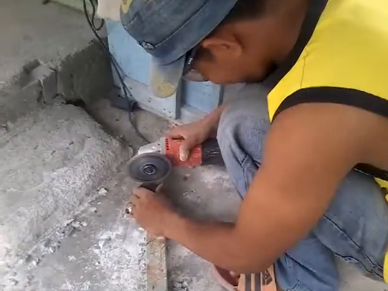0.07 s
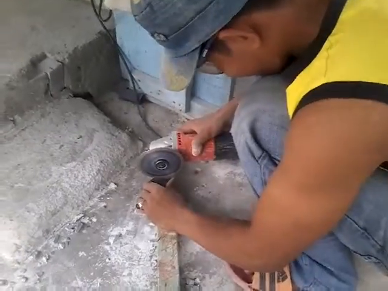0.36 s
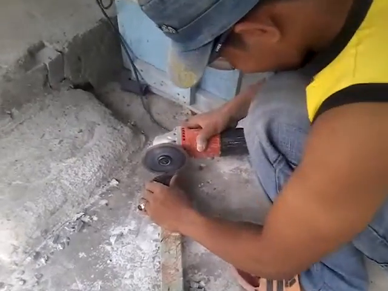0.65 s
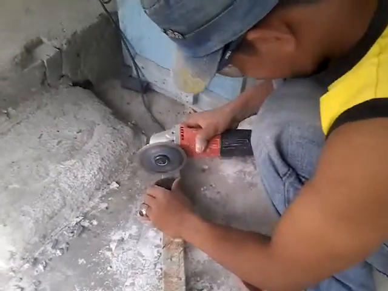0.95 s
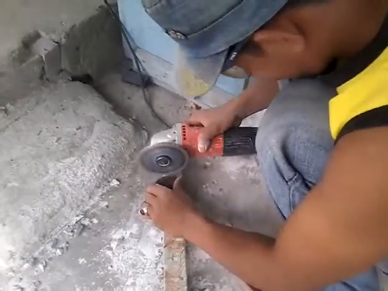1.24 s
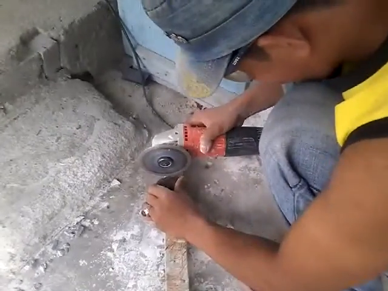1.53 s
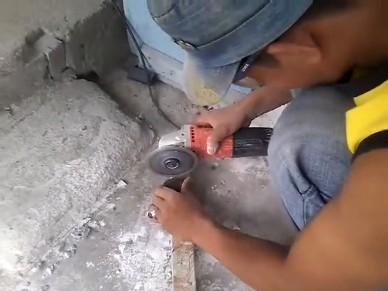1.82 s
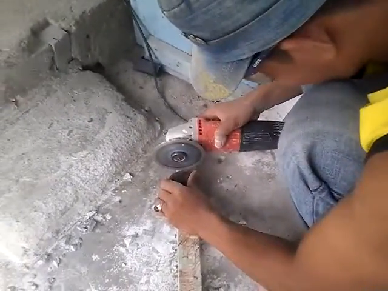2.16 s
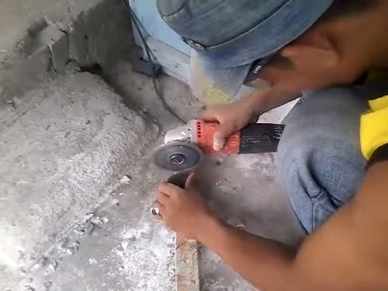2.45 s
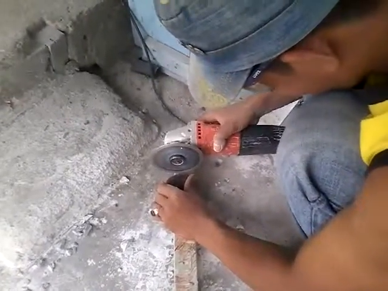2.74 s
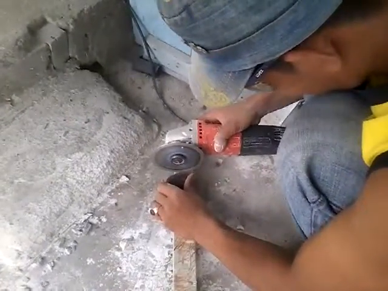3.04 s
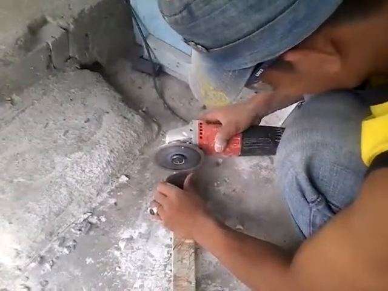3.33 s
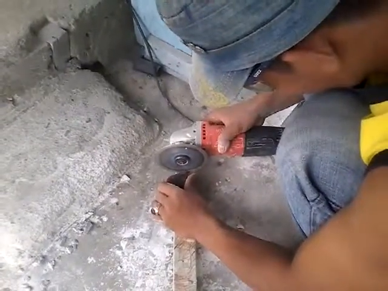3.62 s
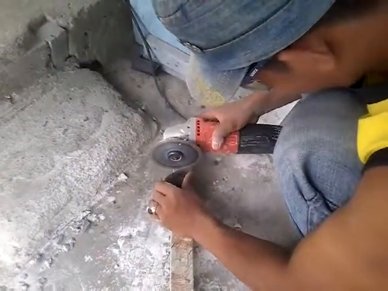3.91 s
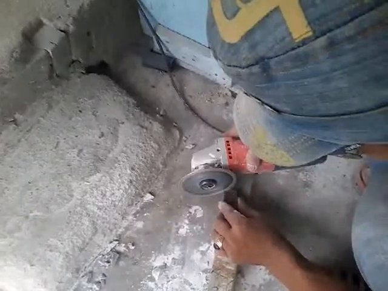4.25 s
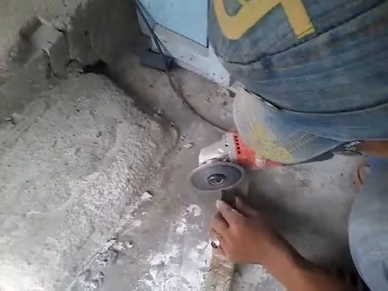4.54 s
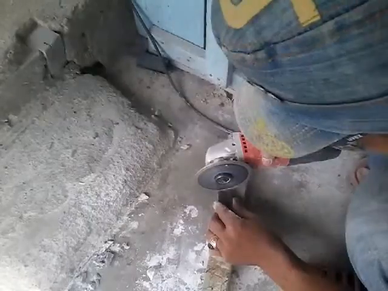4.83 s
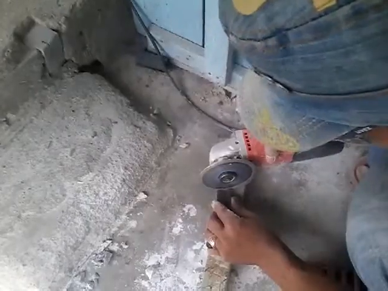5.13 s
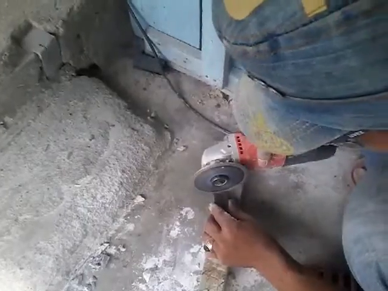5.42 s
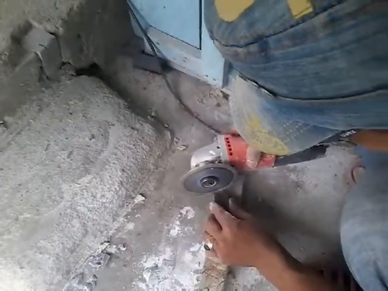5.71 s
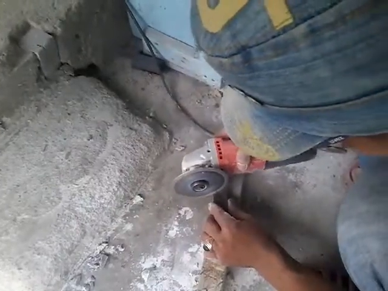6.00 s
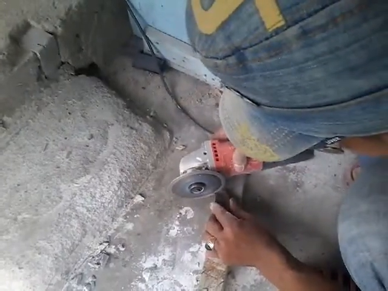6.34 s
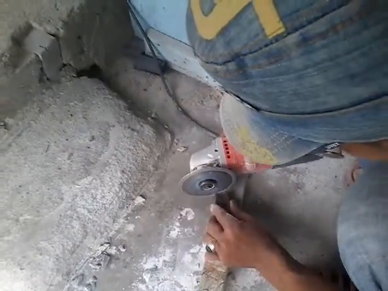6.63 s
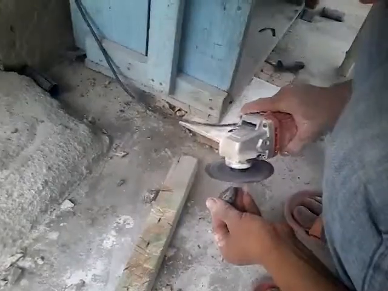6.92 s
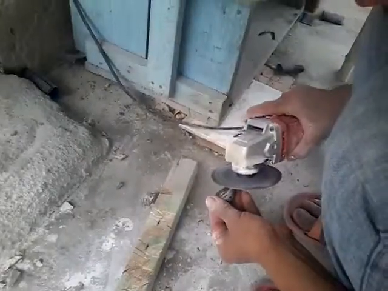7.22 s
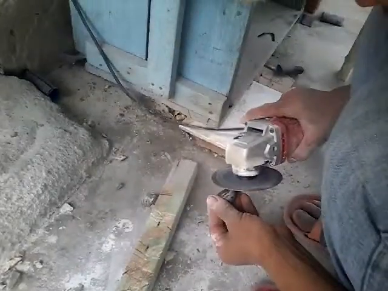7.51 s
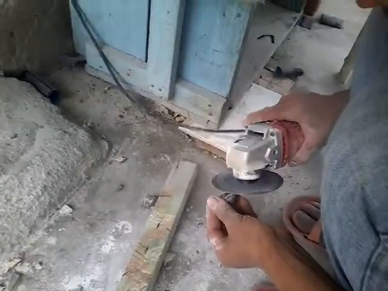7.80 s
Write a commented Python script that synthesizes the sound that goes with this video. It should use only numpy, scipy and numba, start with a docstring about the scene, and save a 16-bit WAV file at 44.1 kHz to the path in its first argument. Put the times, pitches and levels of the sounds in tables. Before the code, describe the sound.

Close, gritty grinding of stone on an angle grinder's disc, light and squealing, then hard and loud, over the motor's high whine.

```python
"""A stone rasps briefly on the steel disc of a whining angle grinder, then is held to it lightly, hard, and
in dabs: three spells of work; the sound cuts abruptly from each to the next. Grit scrapes the stone and
drives the modes of disc and guard; stick-slip friction makes the disc squeal, mostly at light touch.
The motor's fan whines at its blade-passing frequency, which sinks under load, amid the rush of cooling air.
A phone close above picks it up in mono."""
import sys
import numpy as np
from scipy import signal
from scipy.fft import rfft, irfft
from scipy.io import wavfile
from scipy.ndimage import uniform_filter1d, minimum_filter1d
from numba import njit

SR = 44100
rng = np.random.default_rng(int(sys.argv[2]) if len(sys.argv) > 2 else 0)


def bounce(signal):
    """Save signal as a 16-bit WAV file at the path given by the first command-line argument."""
    frames = np.transpose(np.atleast_2d(signal))
    limited = np.clip(frames, -1, 1)
    pcm = np.round(limited * 32767).astype(np.int16)
    wavfile.write(sys.argv[1], SR, pcm)


N = 351036
TIME = np.arange(N) / SR

# spells of work: start t/s, rotor speed at the start f/Hz, speed approached without load f/Hz
SPELLS = [(0, 474.3, 508.6), (3.68, 472.6, 508.8), (6.25, 487, 502.4)]


def grinding(motor_hz, contact, seating, flex, gear_ratio=2.84):
    """Friction noise: one rough force makes the dry scrape and rings disc and guard, as the rim knocks."""
    # spectrum of the scrape: f/Hz, relative level/dB
    scrape_spectrum = [(60, -33), (600, -24), (900, -27), (1400, -15), (1800, -8.5), (2100, -6.5),
                       (2500, 3.5), (4500, 6.5), (6200, -32), (9000, 12), (11000, 5.5), (13000, 2.5),
                       (13700, -9), (14300, -45)]
    # disc modes: touching f/Hz, pressed f/Hz, nominal width/Hz,
    # level/dB touching, on edge and flat, change/dB with the tool tipped up
    disc_modes = [(2405, 2420, 45, -25, -29, -30, -8), (3255, 3245, 42, -18, -12.5, -14, -4),
                  (3360, 3352, 60, -15, -4.5, -10, 1.5), (3595, 3608, 50, -19.5, -16, -13, -2),
                  (3714, 3730, 36, -13.5, -19, -18, -4), (4400, 4340, 58, -12, -9.5, -2.8, 4),
                  (4515, 4490, 50, -12.5, -16, -14, 2), (4680, 4700, 55, -18, -19, -18.5, -2),
                  (5665, 5650, 55, -7, 0.5, -2.5, 3), (6015, 6100, 42, -14, -5.5, -4.5, 2),
                  (6680, 6660, 50, -22, -17, -12, 0), (7210, 7240, 35, -13, -8, -7, 8),
                  (7380, 7335, 48, -0.5, 3, 2.5, 2.5), (7775, 7820, 36, -3, -3, -6, -7),
                  (8128, 8170, 55, -7, -5, -8, -5), (8560, 8440, 55, -10.5, -14, -11, -3),
                  (8820, 8830, 100, -13, -11, -11.5, -4), (9150, 9120, 70, -15, -18, -12, -3),
                  (9490, 9475, 36, -6.5, -2.5, -9.5, 4), (9560, 9570, 46, -12, -7.5, -5.5, -4),
                  (9860, 9965, 40, -10, -9, -9.5, 2), (10150, 10170, 65, -12, -16, -14, -2),
                  (10840, 10780, 50, -12, -20.5, -20.5, -2), (11300, 11300, 85, -11.5, -19, -20, 0),
                  (11900, 11820, 48, -10, -13.5, -14.5, -4), (12190, 12300, 35, -14.5, -15, -15.5, 0),
                  (12930, 13080, 90, -16.5, -21, -19, 0), (14380, 14400, 130, -23, -20, -17.5, 0)]
    # low modes of the guard: columns as for the disc
    guard_modes = [(670, 623, 120, -58, -41, -57, -3), (861, 803, 55, -28.5, -61, -30.5, 6),
                   (1036, 1130, 23, -39.5, -30.5, -38.5, 2), (1372, 1420, 115, -26.5, -27.5, -26.5, 3),
                   (1667, 1560, 63, -29.5, -36, -36, 3), (1810, 1800, 100, -40, -26, -26, 11)]
    force = grit()
    scrape = colour(force, scrape_spectrum)
    disc = steel(force, seating, flex, disc_modes, damping=0.59)
    guard = steel(force, seating, flex, guard_modes, damping=0.33)
    knocks = rim(angle(motor_hz / gear_ratio), seating)
    return contact * (disc + undb(-1) * (scrape + guard + knocks))


def grit(grain_db=3.5, chatter_db=0.36):
    """Random impacts: grains of uneven size strike the stone, which chatters in the hand."""
    return unit(rng.standard_normal(N) * undb(grain_db * walk(990) + chatter_db * walk(61)))


def steel(force, seating, flex, modes, damping, slide_hz=6, slide_db=0.9):
    """Modal superposition: the lie of the stone tunes and weights the modes; flexing scales the lowest."""
    press = np.minimum(seating, 1)
    # tipping the tool up, over 0.17 s around 6.3 s, turns other modes to the microphone
    tipped = np.clip((TIME - 6.3) / 0.17 + .5, 0, 1)
    out = 0
    for touch_hz, press_hz, width, *seat_db, tipped_db in modes:
        # as the stone slides about, each mode drifts in pitch and strength
        hz = touch_hz + press * (press_hz - touch_hz) + slide_hz * drift(9)
        level_db = np.interp(seating, [0, 1, 2], seat_db) + tipped * tipped_db + slide_db * drift(9)
        nearby_force = ring(force, hz, 10. * width)
        mode = unit(ring(nearby_force, hz, damping * width))
        out += mode * undb(level_db) * (flex if touch_hz < 4000 else 1)
    return out


def rim(spindle, seating, waver_db=12.5):
    """Periodic forcing: the uneven rim knocks at spindle harmonics, the higher ones under a flat stone."""
    # rim tones: harmonic number, touching level/dB, flat level/dB
    harmonics = [(1, -37, -77), (2, -39, -73), (5, -32, -29), (6, -39, -29.5), (8, -26, -69),
                 (9, -34.5, -30), (10, -22.5, -67), (12, -28, -28), (14, -23.5, -34.5), (17, -32, -23),
                 (18, -33, -24.5), (19, -48, -23), (28, -30, -14)]
    out = 0
    for order, touch_db, flat_db in harmonics:
        level_db = touch_db + seating / 2 * (flat_db - touch_db) + waver_db * np.minimum(drift(45), 1)
        out += undb(level_db) * np.sin(order * spindle + drift(35))
    return out


def squeal(width_hz=45., build_s=0.055, swell_s=0.0053):
    """Self-excited vibration: two modes ring shrilly at light touch; at times one grows by stick-slip."""
    # modes on the verge of squealing: start t/s, end t/s, first f/Hz, last f/Hz, level/dB
    shrill_modes = [(1.56, 3.22, 7415, 7365, -18.5), (1.57, 3.0, 7775, 7780, -22)]
    # stick-slip squeals: start t/s, end t/s, level/dB
    squeals = [(1.572, 1.707, -7), (1.786, 1.892, -8.5), (1.906, 2.022, -9), (2.11, 2.242, -5),
               (2.248, 2.278, -5), (2.311, 2.334, -8), (2.453, 2.475, -8), (2.535, 2.573, -9.5),
               (2.687, 2.787, -10), (2.907, 2.94, -6.5), (2.951, 3.044, -9), (3.099, 3.138, -4.5),
               (5.736, 5.84, -12.5), (6.929, 7, -13), (7.271, 7.38, -15)]
    # pitch of the squeal, sinking as the stone bears down: t/s, f/Hz
    glide = [(1.9, 7418), (3.1, 7368)]
    shrill = 0
    for start, end, first_hz, last_hz, db in shrill_modes:
        hz = np.interp(TIME, [start, end], [first_hz, last_hz])
        nearby_force = ring(grit(), hz, 10 * width_hz)
        mode = unit(ring(nearby_force, hz, width_hz))
        shrill += eased(held([(start, end)], [undb(db)]), build_s) * mode
    envelope = eased(held(squeals, [undb(db) for _, _, db in squeals]), swell_s)
    squeal_hz = curve(glide) + 18 * walk(110)
    # the swing saturates while it holds, and passing grains roughen it
    grip_db = 3 * np.minimum(walk(70), .6) + 1.6 * walk(300)
    return shrill + envelope * undb(grip_db) * np.sin(angle(squeal_hz))


def motor_speed(drag_hz, lag_s=1.12):
    """First-order lag: in each spell the rotor creeps towards its free speed less the stone's drag."""
    hz = np.zeros(N)
    step = 1 / (lag_s * SR)
    for start, first_hz, free_hz in SPELLS:
        since = TIME >= start
        target_hz = free_hz - drag_hz[since]
        hz[since] = first_hz + signal.lfilter([step], [1, step - 1], target_hz - first_hz)
    return hz


def fan(motor_hz, loud, blades=12, flutter=0.14):
    """Blade-passing tone: blades chop the air into a whine and its octave; imbalance hums once a turn."""
    # the whine, which beams as the tool is turned: t/s, level/dB
    whine_levels = [(0.0, -44), (0.27, -29), (0.4, -24), (0.54, -31), (0.65, -17.5), (0.76, -31),
                    (0.94, -27), (1.13, -19.5), (1.28, -10.5), (1.52, -11), (1.72, -19), (1.86, -40),
                    (2.08, -19), (2.16, -25), (2.33, -19.5), (2.48, -27.5), (2.7, -18), (2.79, -29),
                    (2.88, -20), (3.1, -31), (3.36, -20.5), (3.47, -24), (3.62, -18.5), (4.1, -37),
                    (6.2, -28), (6.33, -20), (6.56, -13), (6.9, -17.5), (7.15, -16.5), (7.27, -12),
                    (7.55, -14.5), (7.7, -10), (7.84, -20), (7.93, -11.5)]
    # hum of the rotor: t/s, level/dB
    hum_levels = [(0, -85), (0.25, -55), (0.8, -53.5), (1.3, -43), (2.2, -46.5), (2.8, -60), (3.6, -52.5),
                  (4.5, -58), (6.2, -54), (6.6, -46), (7.96, -45)]
    shaft = angle(motor_hz * (1 + 0.00078 * walk(39.1)))
    whine_db = curve(whine_levels)
    off_beam = np.clip((-12 - whine_db) / 8, 0, 1)
    fading_db = 0.5 * off_beam * walk(9.3)
    whine = undb(whine_db + fading_db) * (1 + flutter * walk(230)) * np.sin(blades * shaft)
    # the octave beams less than the main tone
    octave = undb(-25 + 0.51 * whine_db - 2.3 * loud + 2 * walk(22)) * np.sin(2 * blades * shaft)
    # the low hum flickers in and out during loud grinding
    hum_flicker_db = 5 * loud * np.clip(4 * walk(10), -3, 1)
    hum = undb(curve(hum_levels) + 7 * np.minimum(walk(34), 1) + hum_flicker_db) * np.sin(shaft)
    return np.sqrt(2) * (whine + octave + hum)


def cooling_air(loud, flicker_db=1.34, drop_db=-25):
    """Turbulence: fan and disc hiss; vents and housing roar, heard less while the grinding is loud."""
    # strength of the airflow's sound: t/s, relative level/dB
    air_levels = [(0, -27), (.8, -26), (1.3, -19), (1.9, -23.5), (2.6, -28.5), (3.5, -26.5), (4.5, -27),
                  (6.1, -27.5), (6.5, -23.5), (7.96, -23)]
    # spectrum of the hiss: f/Hz, relative level/dB
    hiss_spectrum = [(400, -57), (1500, -33), (3000, -11), (3800, -7.5), (4400, -2.5), (5300, -4),
                     (6500, -1), (7300, 3.5), (8500, -6.5), (9800, -13.5), (11500, -12.5), (12400, -45),
                     (13300, -57)]
    # spectrum of the vents: f/Hz, relative level/dB
    vent_spectrum = [(250, -37), (450, 5.5), (900, 14.5), (1450, 17), (1750, 18), (2150, 15), (3000, 4.5),
                     (6000, -35)]
    # resonances of the motor housing: f/Hz, width/Hz, level/dB relative to the vents
    housing_modes = [(603.6, 4.6, -16), (765, 3.2, -22.5), (1700, 5.2, -11.5)]
    # roar in each spell: level/dB relative to air_levels
    roar_levels = [-11.5, -25, -6.5]
    air_db = curve(air_levels)
    hiss = colour(rng.standard_normal(N), hiss_spectrum) * undb(air_db + 6 + flicker_db * walk(4.2))
    flow = rng.standard_normal(N)
    housing = sum(undb(db) * unit(ring(flow, np.full(N, float(hz)), width))
                  for hz, width, db in housing_modes)
    spell = np.searchsorted([start for start, _, _ in SPELLS], TIME, side="right") - 1
    roar_db = air_db + np.array(roar_levels)[spell] + drop_db * loud + walk(22)
    return hiss + (colour(flow, vent_spectrum) + housing) * undb(roar_db)


def wind_noise(loud, gust_db=3, drop_db=-24):
    """Pressure fluctuations: a low rumble, and air buffeting the microphone once the tool is tipped up."""
    # low rumble: t/s, level/dB
    rumble_levels = [(0, -47), (1.0, -44), (1.9, -42), (2.6, -33), (3.5, -37.5), (4.7, -43), (6.2, -47),
                     (6.7, -40), (7.96, -40)]
    # its spectrum: f/Hz, relative level/dB
    rumble_spectrum = [(25, -20), (70, -13), (120, 5), (170, 4.5), (250, 6.5), (340, -3.5), (600, -13)]
    # buffeting at the microphone: t/s, level/dB
    buffet_levels = [(0, -78), (6.2, -79), (6.35, -48), (6.6, -40.5), (7.2, -38.5), (7.96, -40)]
    # its spectrum: f/Hz, relative level/dB
    buffet_spectrum = [(25, -27), (55, -12), (90, 2.5), (130, 0.5), (250, -11), (600, -24)]
    # the rumble is heard to drop away while the grinding is loud
    rumble_db = curve(rumble_levels) + drop_db * loud
    rumble = colour(rng.standard_normal(N), rumble_spectrum) * undb(rumble_db)
    buffet = colour(rng.standard_normal(N), buffet_spectrum) * undb(curve(buffet_levels))
    return (rumble + buffet) * undb(gust_db * np.minimum(walk(6.5), 1))


@njit
def ring(x, hz, width):
    """Damped resonator driven by x, with a moving centre frequency and a bandwidth in Hz."""
    y, low, band = np.empty(len(x)), 0., 0.
    for i in range(len(x)):
        g = np.tan(np.pi * hz[i] / SR)
        loss = np.pi * width / SR * (1 + g * g) / g
        y[i] = (band + g * (x[i] - low)) / (1 + g * (g + loss))
        band = 2 * y[i] - band
        low += 2 * g * y[i]
    return y


def colour(x, points):
    """Spectral shaping by (f/Hz, level/dB) points, scaled to rms 1."""
    hz, db = np.transpose(points)
    f = np.arange(1, N // 2 + 2) * SR / N
    gain = undb(np.interp(np.log(f), np.log(hz), db))
    return unit(irfft(rfft(x) * gain, N))


def walk(corner_hz):
    """Low-pass noise: a smooth random wander of rms 1."""
    spectrum = rfft(rng.standard_normal(N))
    f = np.arange(len(spectrum)) * SR / N
    return unit(irfft(spectrum / (1 + (f / corner_hz) ** 4), N))


def drift(rate):
    """Linear interpolation of random values, rate a second."""
    return np.interp(TIME * rate, np.arange(1024), rng.standard_normal(1024))


def curve(points):
    """Linear interpolation of (t/s, value) points."""
    return np.interp(TIME, *np.transpose(points))


def held(events, values):
    """Rectangular pulses: each value lasts from its event's start to its end."""
    return sum(value * ((TIME >= start) & (TIME < end))
               for (start, end, *_), value in zip(events, values))


def eased(x, seconds):
    """Moving average, which turns steps into ramps."""
    return uniform_filter1d(x, int(seconds * SR))


def angle(hz):
    """Phase as the integral of frequency."""
    return 2 * np.pi * np.cumsum(hz) / SR


def undb(db):
    """Decibels to amplitude ratio."""
    return 10 ** (np.asarray(db) / 20)


def unit(x):
    """Normalisation to rms 1."""
    return x / np.sqrt(np.mean(x ** 2))


def scene(touch_s=0.11, bite_s=0.022, idle_db=-46.5, hand_db=1.43, light_hz=25.5, heavy_hz=42):
    """Superposition at one spot: the strokes of the stone load the motor and drive the grinding."""
    # strokes: start t/s, end t/s, drag on the rotor f/Hz,
    # seating (0 touching, 1 on edge, 2 flat), level/dB, flexing of the disc/dB
    strokes = [(0, 0.192, 58, 0.57, -18.5, -1.5), (0.901, 1.15, 3.6, 0.69, -34, -13),
               (1.139, 1.863, 10.1, 0, -24, 6), (1.847, 2.297, 29.1, 0, -21.5, 7),
               (2.304, 2.734, 33, 0.17, -20.5, 2), (2.723, 3.332, 47.6, 0.24, -20, -0.5),
               (3.681, 4.221, 91, 0.87, -17.5, 3.5), (4.226, 4.502, 81, 1.5, -16, 3.5),
               (4.499, 5.3, 68, 2, -19, 2.5), (5.3, 5.952, 81, 1.84, -20, 4.5),
               (5.948, 6.252, 91.8, 1.65, -20.5, 4.5), (6.255, 6.453, 23, 0.59, -24.5, 9.5),
               (6.8, 7.122, 22.3, 0.088, -23.5, 7.5), (7.122, 7.606, 22, 0.2, -27.5, 6.5),
               (7.838, 8.003, 20, 0, -24.5, 5)]
    # bites, where an edge of the stone digs in: t/s, extra level/dB, extra flexing/dB
    bites = [(1.187, 13, -9), (3.275, 8, 6), (3.76, -1, -6), (3.901, 15, 1), (4.11, -4, 9.5),
             (4.36, -2.5, -2), (4.5, -1.5, -2), (6.29, 5.5, -10), (6.97, 4.5, -7), (7.07, 4, 5),
             (7.339, 6, 0)]
    _, _, drag_hz, seats, level_db, flex_db = np.transpose(strokes)
    bite_times, extra_db, extra_flex_db = np.transpose(bites)
    drag = held(strokes, drag_hz)
    motor_hz = motor_speed(drag)
    # 0 at light drag, 1 in the heavy strokes, where the grinding is loud
    loud = eased(np.clip((drag - light_hz) / (heavy_hz - light_hz), 0, 1), seconds=0.05)
    bite_pulses = np.exp(-((TIME[:, None] - bite_times) / bite_s) ** 2)
    # the free disc still rings faintly; the hand is slow to change its pressure, and unsteady
    contact = eased(np.maximum(held(strokes, undb(level_db)), undb(idle_db)), touch_s)
    contact *= undb(bite_pulses @ extra_db + hand_db * walk(3.2))
    seating = np.clip(eased(held(strokes, seats), touch_s), 0, 2)
    flex = undb(eased(held(strokes, flex_db), touch_s) + bite_pulses @ extra_flex_db)
    machine = fan(motor_hz, loud) + cooling_air(loud) + wind_noise(loud)
    mono = machine + grinding(motor_hz, contact, seating, flex) + squeal()
    return np.array([mono, mono])


def record(dry, ceiling=.76, hold_s=.004, top_hz=14600):
    """Peak and band limiting: the phone ducks the loudest peaks, then cuts the highest treble."""
    hold = int(hold_s * SR)
    allowed = np.minimum(1, ceiling / (np.abs(dry[0]) + 1e-9))
    gain = uniform_filter1d(minimum_filter1d(allowed, hold), hold)
    lowpass = signal.ellip(10, .2, 80, top_hz, fs=SR, output="sos")
    return signal.sosfilt(lowpass, dry * gain)


dry = scene()
out = record(dry)
bounce(out)
```